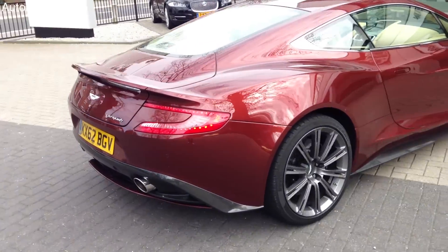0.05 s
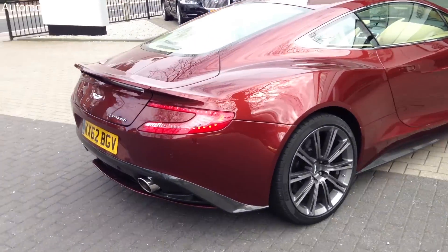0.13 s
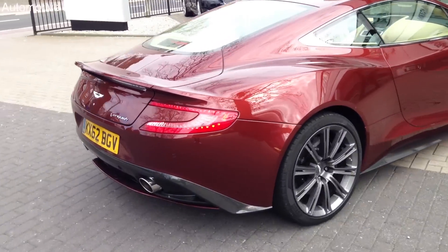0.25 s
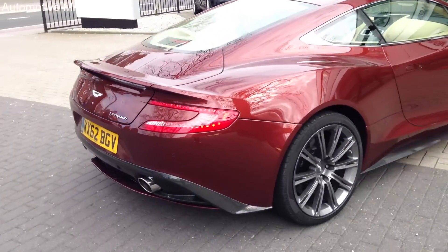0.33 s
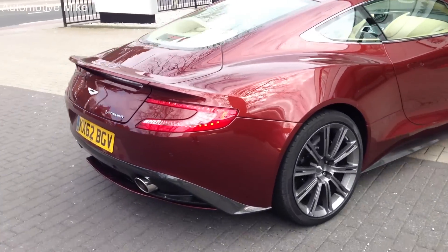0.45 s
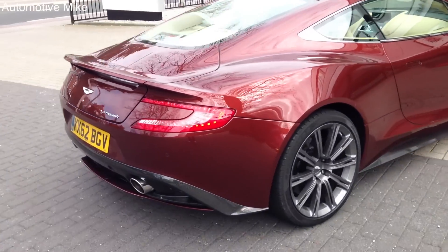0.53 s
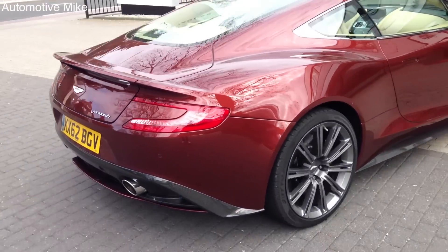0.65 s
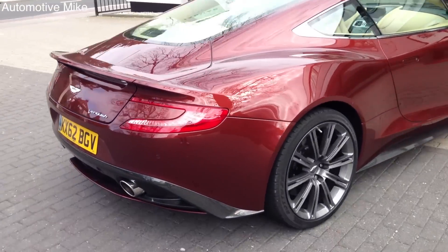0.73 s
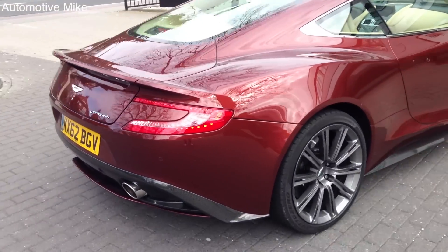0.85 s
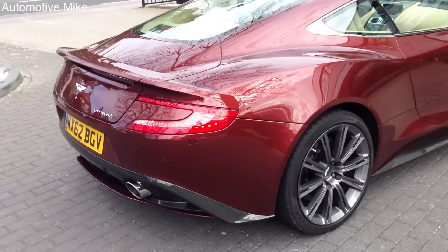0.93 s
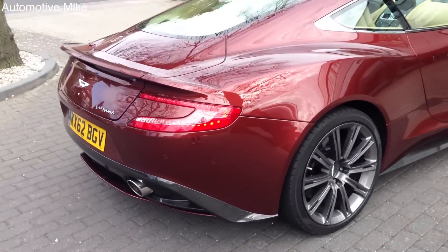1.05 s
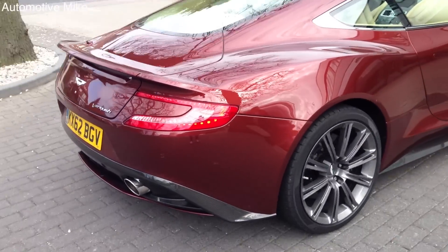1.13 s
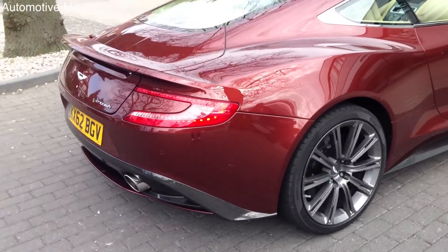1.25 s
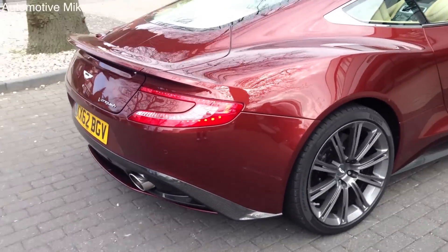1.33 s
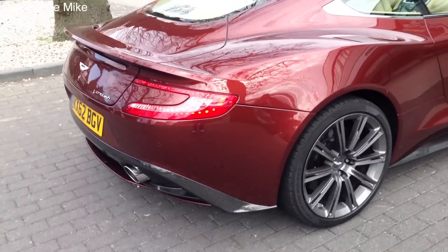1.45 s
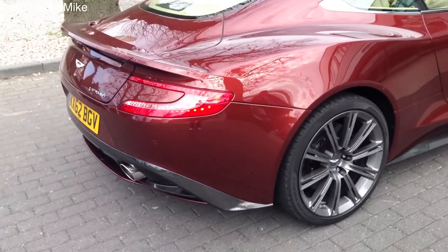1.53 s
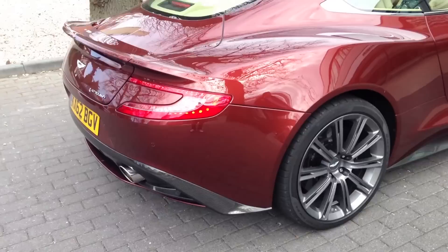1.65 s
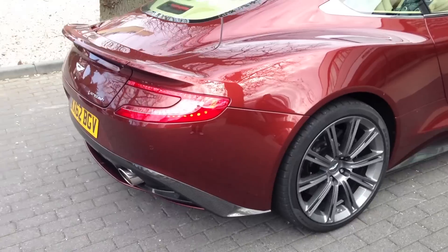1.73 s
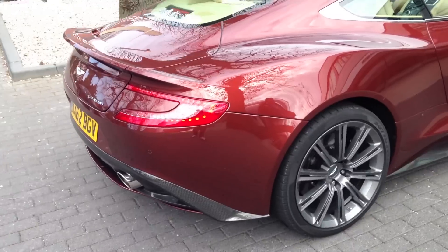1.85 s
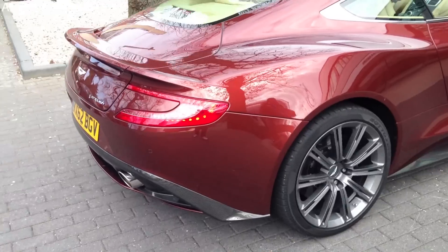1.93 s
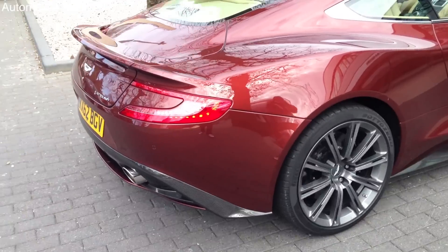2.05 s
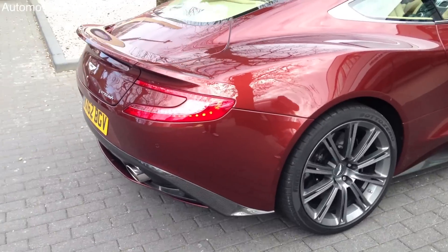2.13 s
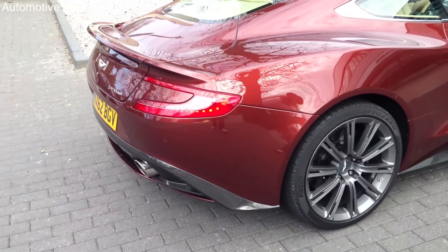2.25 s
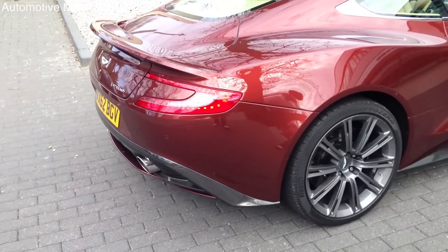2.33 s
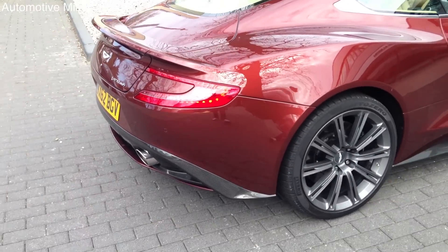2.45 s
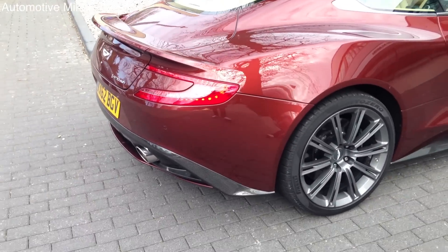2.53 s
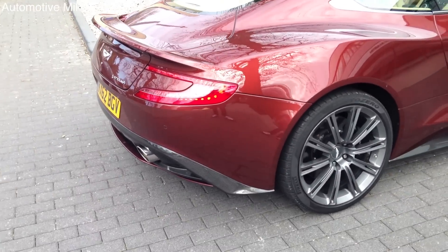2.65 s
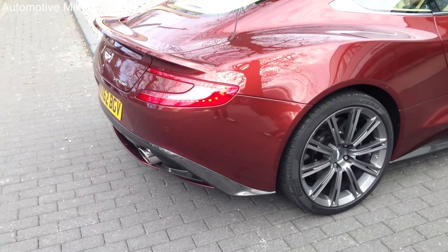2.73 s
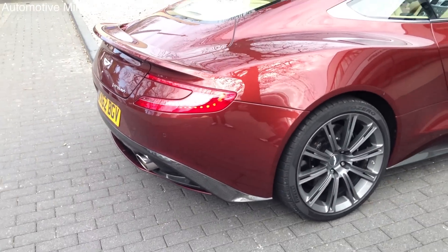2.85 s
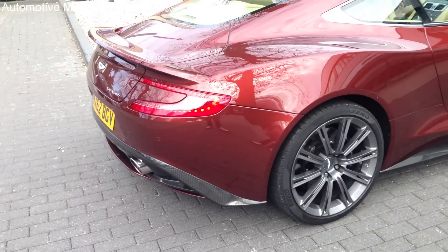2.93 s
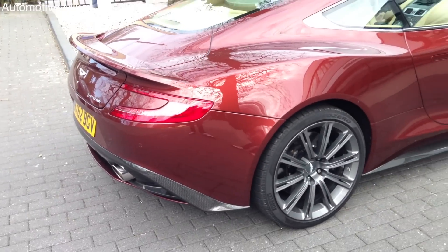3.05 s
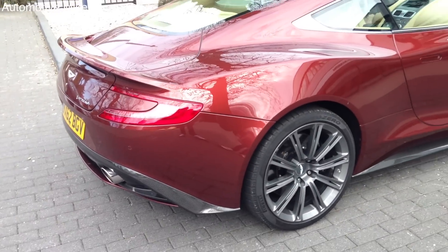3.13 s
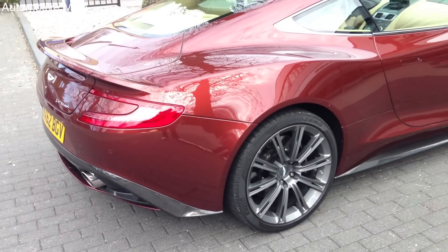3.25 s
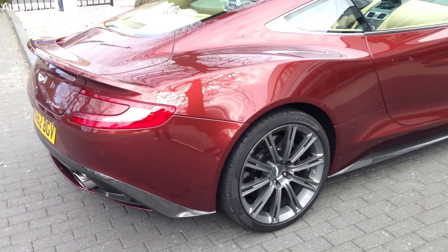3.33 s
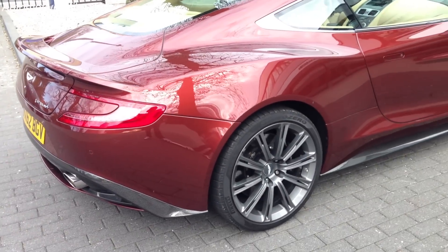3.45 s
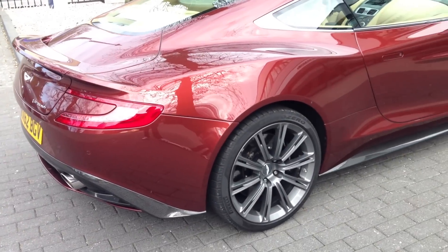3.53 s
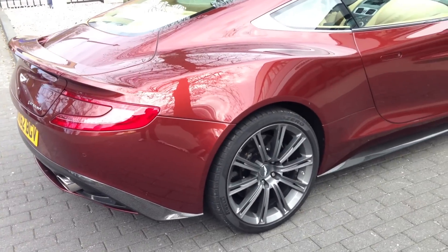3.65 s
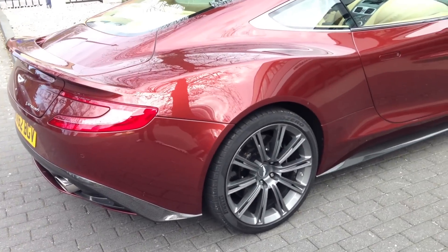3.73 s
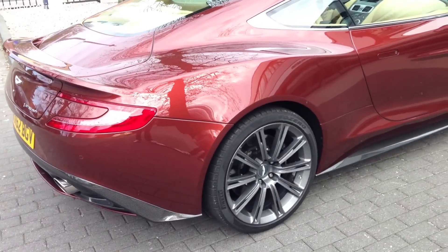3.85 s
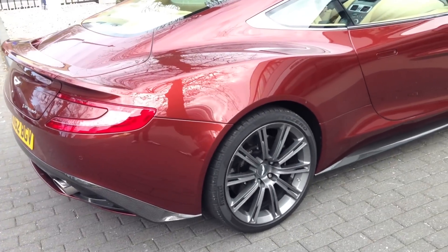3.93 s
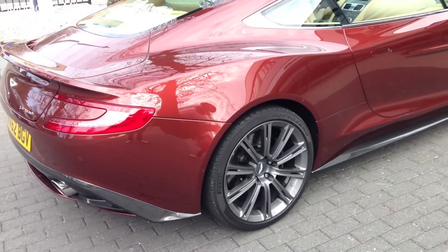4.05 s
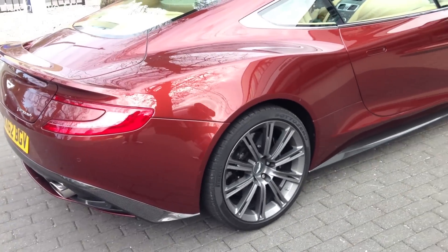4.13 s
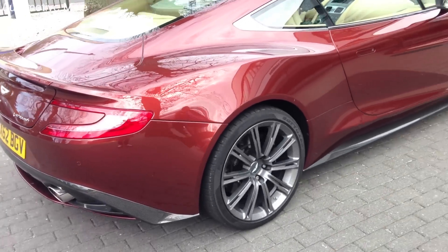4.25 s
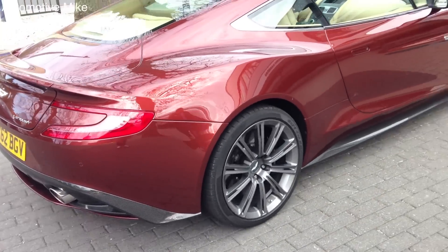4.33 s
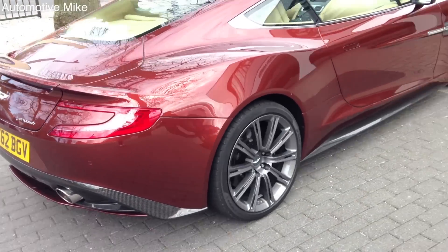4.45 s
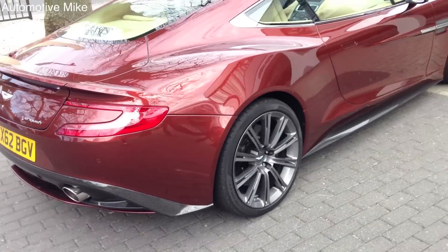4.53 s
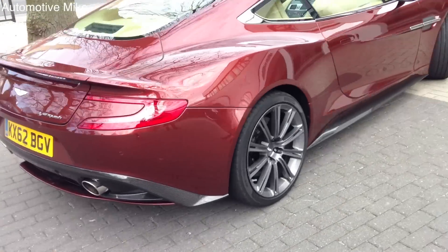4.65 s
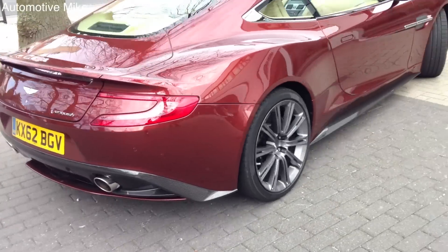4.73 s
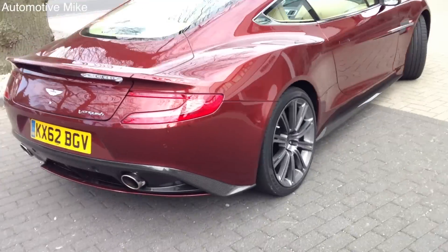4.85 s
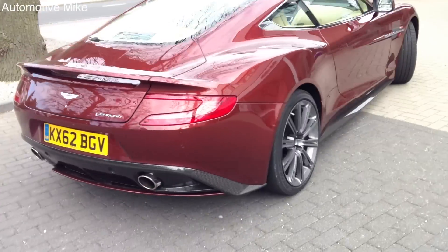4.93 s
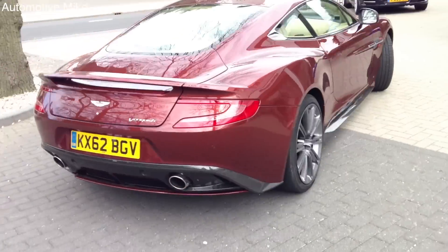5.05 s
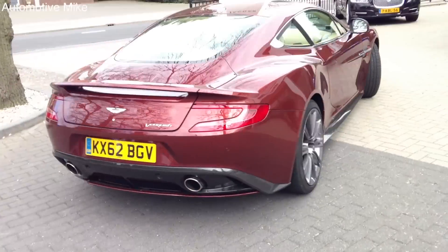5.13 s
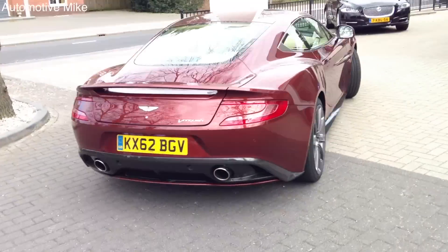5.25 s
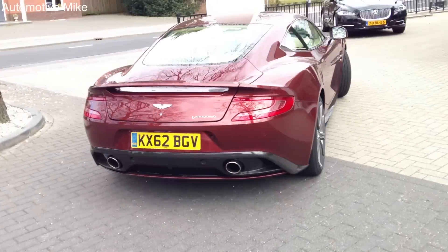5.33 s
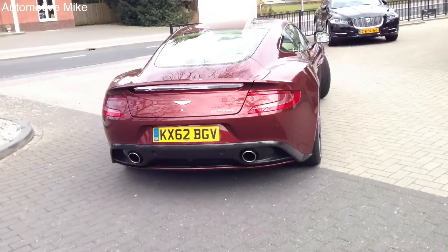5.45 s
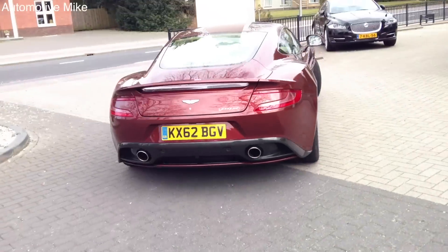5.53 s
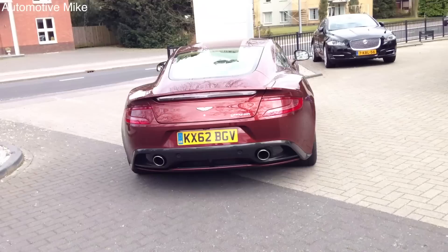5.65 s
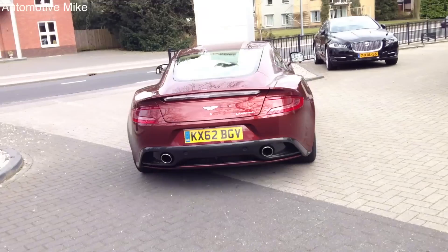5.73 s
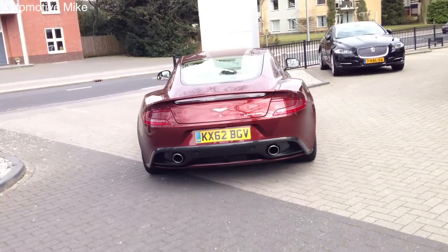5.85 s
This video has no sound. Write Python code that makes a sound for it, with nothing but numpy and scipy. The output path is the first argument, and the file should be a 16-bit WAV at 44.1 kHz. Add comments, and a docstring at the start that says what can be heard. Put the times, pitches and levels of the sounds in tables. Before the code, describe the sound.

Close single-channel pickup of a big car's tail pipes: a soft, lumpy burble with breathy gas hiss and faint distant-traffic air. After a brief rise in idle speed and a quiet dip, the engine climbs quickly into a loud, snarling, gritty pull-away, then falls to a smoother low drone as it recedes. Low thumps on the microphone and sharp stone clicks under the tyres are scattered throughout.

```python
"""Twelve-cylinder car pulling away

A twelve-cylinder car idles on a paved forecourt, creeps round, then pulls away with a short burst of throttle.
Uneven firings excite the exhaust resonances: tones at half multiples of crank speed give the boom, puffs and
dense high orders the rasp that opens under load, and filtered noise the hissing gas and the rush of air.
Around it: quiet street air as shaped noise, a faint high whine as narrow-band noise, dull bumps at the
hand-held microphone as damped swings, and grit ticking under the tyres as short noise cracks."""
import sys
import numpy as np
from scipy import signal
from scipy.fft import rfft, irfft, next_fast_len
from scipy.io import wavfile
from scipy.ndimage import uniform_filter1d

SR = 44100
rng = np.random.default_rng(int(sys.argv[2]) if len(sys.argv) > 2 else 0)


def master(y):
    """Save y as 16-bit WAV."""
    cut = np.clip(np.atleast_2d(y).T, -1, 1)
    pcm = np.round(cut * 32767)  # scale
    wavfile.write(sys.argv[1], SR, pcm.astype(np.int16))


def ratio(d):
    """dB to gain"""
    e = np.asarray(d, float) / 20
    return 10 ** e


N = 259308
TIME = np.arange(N) / SR

# Spectrum of the street air. Each row: frequency in Hz, relative gain in dB.
STREET_SPECTRUM = [(20, -32), (32, -17), (50, -10.5), (90, -8), (300, -6), (700, -16), (1500, -24),
                   (3000, -33.5), (5000, -37), (9500, -36.5), (15300, -40.5)]
# Dull bumps at the microphone. Each row: start in seconds, approximate peak in dB.
BUMPS = [(0.219, -29), (1.747, -35), (1.898, -42), (2.245, -30.5), (3.14, -35), (3.549, -40), (3.786, -34),
         (4.187, -46), (4.646, -38), (4.946, -19), (5.09, -26), (5.473, -38), (5.679, -40)]
# Grit under the tyres. Each row: start in seconds, peak in dB, centre in Hz, decay of the noise in seconds.
TICKS = [(0.5, -34, 1060, .009), (0.87, -50, 5500, 0.033), (0.92, -54, 4500, .03), (3.143, -50, 8000, .005),
         (3.445, -46.5, 5070, .005), (5.058, -36, 6000, 0.005), (5.347, -25.5, 2560, 0.0036)]
# Speed of the crankshaft. Each row: time in seconds, turns per second.
CRANK_SPEED = [(0.0, 11.21), (0.4, 11.29), (0.6, 11.12), (1.0, 11.44), (1.8, 10.98), (2.2, 11.53),
               (2.4, 12.26), (2.6, 13.2), (2.8, 13.55), (3.4, 13.24), (3.6, 12.76), (3.8, 11.86),
               (4.0, 11.81), (4.2, 12.69), (4.4, 14.64), (4.8, 20.71), (5.05, 23.65), (5.3, 25.42),
               (5.4, 25.36), (5.48, 24.7), (5.62, 23.0), (5.88, 22.1)]
# Crack of each cylinder in the pipe at idle, in firing order. Each entry: mean strength in dB.
CYLINDERS = [-6, -3, -8, 2, -5, 0, -6, -8, -6, 3, -4, 8]
# Load on the engine. Each row: time in seconds, gain in dB of the drone, of the rasp,
# and of the rush of air and tyres.
LOAD = [(0.0, -43, -52, -60), (0.6, -43.5, -52.5, -64.5), (1.0, -40, -50.5, -62), (1.8, -47, -53, -62.5),
        (2.2, -41.5, -50, -65.5), (2.7, -39, -45.5, -70), (3.6, -39, -48, -79), (4.0, -50, -56.5, -71),
        (4.25, -43, -55, -66), (4.4, -43.5, -42.5, -63.5), (4.7, -29, -30.5, -54), (4.9, -25.5, -28, -53),
        (5.1, -25.5, -23, -51), (5.33, -26, -27, -50.5), (5.5, -29.5, -35, -52.5),
        (5.65, -31.5, -39.5, -55), (5.88, -36, -48, -57.5)]
# Low exhaust resonances. Each row: centre in Hz, width in Hz, relative gain in dB.
BOOM = [(64, 42, -25), (104, 22, -13), (161, 26, -7), (187, 44, 0), (249, 70, -5)]
# Boom over its usual gain. Each row: time in seconds, gain in dB of the two lowest resonances, of the highest.
BOOM_LEVEL = [(0.0, 1.5, 2), (1.0, -2.5, 1), (1.8, 4.5, 4), (2.4, 0, 3.5), (3.2, -5, -0.5), (3.7, 1, 3.5),
              (4.0, 9.5, 7.5), (4.3, 2, 8.5), (4.7, -2, 3), (5.1, 2.5, -0.5), (5.4, 1.5, 1), (5.88, 4.5, 0)]
# Middle exhaust resonances. Each row: centre in Hz, width in Hz, relative gain in dB.
UPPER = [(343, 90, -17.5), (416.2, 40, -14), (476.4, 57, -15.5), (536.4, 21.6, -15)]
# Middle resonances in the drone. Each row: time in seconds, gain in dB of the lowest, of the others.
UPPER_LEVEL = [(0.0, 2, 8), (0.5, 2, 4), (1.0, -5, 0), (1.5, -25, -4), (2.4, -11, 8), (3.0, 2, 2.5),
               (3.7, 1.5, 10), (4.0, -9, 12), (4.4, -9, -23), (4.9, -2, 3), (5.2, 9.5, 3), (5.36, 8, 6.5),
               (5.6, 7.5, 5), (5.88, 3, 6)]
# High exhaust resonances. Each row: centre in Hz, width in Hz, relative gain in dB.
RASP = [(409, 125, -1.5), (506, 82, 0), (770, 67, -2.5), (861, 60, -0.5), (986, 72, -8), (1028, 51, -12.5),
        (1282, 88, -7.5), (1520, 130, -13.5)]
# Resonances that only the hard flow of revving excites. Each row: centre in Hz, width in Hz, gain in dB.
SNARL = [(540, 50, -6), (930, 200, -6), (1040, 60, -8), (1295, 60, -18)]
# Tones of the firing pattern, one row per half multiple of crank speed from FIRST_ORDER up.
# Each row: gain in dB at idle, at fast idle, pulling, off throttle at speed.
ORDER_TONES = [(3, -9, -4, -8), (-7, -7, 10, 0), (-5, -6, -8, -5), (-6, -5, -7, 3), (10, 7, 16, 12),
               (-2, -10, -14, -2), (-3, -9, -7, -15), (3, -4, -9, -12), (-7, -14, -9, -14),
               (-8, -8, -11, -21), (13, 10, 5, -4), (-14, -12, -11, -4), (-15, -6, 1, 11), (-5, -2, 1, -4),
               (-10, -1, 2, 2), (-6, -7, -4, 3), (12, 16, 1, 10), (-7, -11, -4, -1), (-9, -3, 4, 1),
               (-2, -1, -1, -3), (-3, 6, -2, -4), (-10, -4, -3, -9), (13, 8, 4, 0), (-5, 1, -5, 0),
               (6, 9, -10, 9), (-1, 4, -10, 2), (2, -8, -4, -2), (-7, -13, -5, -7), (3, -2, -4, -4),
               (-3, -9, 4, 6), (4, 7, -6, -4), (-1, 0, -9, -4), (-2, -5, -3, -7), (0, -2, 2, -8),
               (7, 1, -11, -13), (-4, -3, 1, -11), (5, -1, -3, -7), (-2, -5, -5, -4), (-8, -6, 7, -3),
               (-12, -12, 3, -9), (-4, -4, 3, -2), (-4, -6, 7, -2), (-12, -5, 11, 0), (4, -8, 6, -1),
               (0, 0, 3, -10), (-2, 0, 4, -3), (1, 0, 5, 0), (-5, 2, 5, -1), (1, -4, 5, -2),
               (-11, -3, 5, -6), (-7, -3, 5, -7), (-12, -11, 5, -8), (-4, 0, 5, -4), (-6, -7, 5, 1),
               (-4, -2, 5, 4), (-11, -14, 5, 2)]
FIRST_ORDER = 4
# Spectrum of the gas hiss. Each row: frequency in Hz, relative gain in dB.
GAS_SPECTRUM = [(900, -5.5), (1150, -4), (1400, 5), (1620, -0.5), (2000, -3.5), (2290, -4), (2600, -5),
                (2900, -4), (4000, -21), (6000, -33), (12000, -33)]
# Spectrum of the rush of air and tyres. Each row: frequency in Hz, relative gain in dB.
RUSH_SPECTRUM = [(1500, -5), (3500, -2.5), (7000, -5), (11000, -11), (15300, -23)]
# Hard firings as the throttle opens. Each row: start in seconds, peak in dB.
BARKS = [(4.538, -26.5), (4.586, -22)]
# Bands of grit in the exhaust jet. Each row: centre in Hz, width in Hz, gain in dB at top speed.
JET_GRIT = [(1960, 220, -3.5), (2218, 300, 6), (2740, 250, -3), (3290, 230, -4), (3870, 800, -7.5)]
# Grit in the exhaust jet under load. Each row: time in seconds, gain in dB.
JET_GRIT_LEVEL = [(4.4, -75), (4.65, -50.5), (4.9, -48), (5.1, -49.5), (5.3, -43.5), (5.42, -50.5),
                  (5.6, -67), (5.88, -61)]

EVEN_AT_SPEED = 0.6  # share of the cylinder pattern and of the turbulence lost when revving
SWELL_TURN = 0.25  # share of a turn at which roar and jet grit swell


def level(x, db):
    """Root mean square: scale a signal to a given rms level in dB."""
    return x * ratio(db) / np.sqrt(np.mean(x ** 2))


def colour(x, gain):
    """Minimum-phase filtering: the folded cepstrum of a gain over Hz gives a causal response."""
    size = next_fast_len(len(x) + SR // 2)
    hz = np.fft.rfftfreq(size, 1 / SR) + 1e-3
    cepstrum = irfft(np.log(gain(hz) + 1e-9), size)
    cepstrum[1:size // 2] *= 2
    cepstrum[size // 2 + 1:] = 0
    return irfft(rfft(x, size) * np.exp(rfft(cepstrum)), size)[:len(x)]


def resonances(modes):
    """Parallel resonance: the powers of steep modes add, leaving dark gaps in between."""
    def gain(hz):
        return np.sqrt(sum(ratio(2 * db) / (1 + ((hz - f * f / hz) / width) ** 2) ** 2 for f, width, db in modes))
    return gain


def slope(points):
    """Spectral envelope: gain in dB runs straight over log frequency between the points."""
    hz_at, db_at = np.transpose(points)
    return lambda hz: ratio(np.interp(np.log(hz), np.log(hz_at), db_at))


def columns_at(time, table):
    """Linear interpolation: every column of a table whose first column is time in seconds."""
    s, *columns = np.transpose(table)
    return [np.interp(time, s, column) for column in columns]


def walk(rate):
    """Random modulation: chance levels held 1 / rate seconds and smoothed twice."""
    hold = int(SR / rate)
    steps = np.repeat(rng.standard_normal(N // hold + 1), hold)
    return uniform_filter1d(uniform_filter1d(steps, hold), hold)[:N]


def slow(size, width):
    """Smoothed chance: noise averaged twice over width steps and brought to unit spread."""
    wander = uniform_filter1d(uniform_filter1d(rng.standard_normal(size), int(width)), int(width))
    return wander / wander.std()


def steady(x, window_s=0.45):
    """Power normalisation: even out the slow swell, so that a later gain sets it."""
    return x / np.sqrt(uniform_filter1d(x ** 2, int(window_s * SR)))


def revs(turns):
    """Speed scale: 0 up to 14 turns per second, 1 from 20."""
    return np.clip((turns - 14) / 6, 0, 1)


def street():
    """Broadband noise: distant traffic and air blend into one spectrum that swells gently."""
    air = level(colour(rng.standard_normal(N), slope(STREET_SPECTRUM)), -45.5)
    return air * ratio(0.7 * walk(2.5))


def bumps(hz=60, decay_s=0.0037):
    """Heavily damped oscillation: each bump is one low swing that dies almost at once."""
    out, t = np.zeros(N), np.arange(8000) / SR
    swing = t / decay_s * np.exp(1 - t / decay_s) * np.sin(2 * np.pi * hz * t)
    for s, db in BUMPS:
        out[int(s * SR):][:len(t)] += ratio(db) * swing
    return out


def ticks():
    """Impulsive excitation: grit gives short decaying noise through one wide resonance."""
    out, t = np.zeros(N), np.arange(4000) / SR
    for s, db, hz, decay_s in TICKS:
        noise = rng.standard_normal(len(t)) * np.exp(-t / decay_s)
        crack = colour(noise, resonances([(hz, 0.74 * hz, 0)]))
        out[int(s * SR):][:len(t)] += ratio(db) * crack / abs(crack).max()
    return out


def whine():
    """Narrow-band noise: a sharp resonance makes a faint, unsteady high tone while the car idles near."""
    tone = colour(rng.standard_normal(N), resonances([(6700, 130, 0)]))
    nearness = np.exp(-((TIME - 1.7) / 1.3) ** 2)  # strongest at 1.7 s
    return level(tone, -73) * ratio(2.5 * walk(14)) * nearness


def jet_grit(turns, spit_db=5, patchy_db=6):
    """Amplitude modulation: grit at the tail pipes is bands of hiss, each flaring alone, all pulsing per turn."""
    angle = 2 * np.pi * (np.cumsum(turns) / SR - SWELL_TURN)
    opening_db = 0.5  # per octave above the lowest band and turn per second
    bands = 0
    for mode in JET_GRIT:
        octaves = np.log2(mode[0] / JET_GRIT[0][0])
        band = colour(rng.standard_normal(N), resonances([mode]))
        bands = bands + band * ratio(patchy_db * walk(12) + opening_db * octaves * (turns - turns.max()))
    gate = ratio(spit_db * (np.cos(angle) + walk(60)))
    gain_db, = columns_at(TIME, JET_GRIT_LEVEL)
    return level(bands * gate, 0) * ratio(gain_db)


def barks(rise_s=0.0037, decay_s=0.024):
    """Transient resonance: each hard firing drives a short burst of gas through the upper pipe."""
    out, t = np.zeros(N), np.arange(4000) / SR
    pipe = resonances([(520, 150, -3), (830, 220, 0), (1270, 180, -2), (1600, 160, -7)])
    for s, db in BARKS:
        gas = rng.standard_normal(len(t)) * (1 - np.exp(-t / rise_s)) * np.exp(-t / decay_s)
        burst = colour(gas, pipe)
        out[int(s * SR):][:len(t)] += ratio(db) * burst / abs(burst).max()
    return out


def firings(turns, scatter_db):
    """Periodic excitation: twelve pulses in two turns even out with speed, and every burn differs."""
    count = 6 * np.cumsum(turns) / SR
    k = np.arange(int(count[-1]))
    jitter_s = 0.0004 * rng.standard_normal(len(k))  # burns come a little early or late
    at_s = np.clip(np.interp(k, count, TIME) + jitter_s, 0, TIME[-1])
    at = (at_s * SR).astype(int)
    uneven = 1 - EVEN_AT_SPEED * revs(turns[at])
    strength_db = uneven * np.take(CYLINDERS, k % len(CYLINDERS)) + scatter_db * rng.standard_normal(len(k))
    return np.bincount(at, ratio(strength_db), N)


def roar(turns, step=128):
    """Harmonic excitation: dense wavering high orders sing through the rasp resonances only when revving."""
    on = np.argmax(revs(turns) > 0)
    time, angle, out = TIME[on:], 2 * np.pi * np.cumsum(turns)[on:] / SR, 0
    coarse_time, coarse_turns = time[::step], turns[on::step]
    # this resonance climbs 28 Hz per turn per second as the gas speeds up
    whistle = (1580 + 28 * (coarse_turns - 20), 130, -12)
    pipe = resonances(RASP[2:-2] + SNARL + [whistle])
    for order in np.arange(23, 100, 0.5):
        hz = order * coarse_turns
        gain = pipe(hz) * ratio(4 * slow(len(hz), 30))
        phase = 2 * np.pi * rng.random() + 0.4 * slow(len(hz), 45)
        tone = np.cos(order * angle + np.interp(time, coarse_time, phase))
        out = out + np.interp(time, coarse_time, gain) * tone
    swell = np.cos(angle - 2 * np.pi * SWELL_TURN) + 0.5 * walk(30)[on:]  # once a turn
    out = out * ratio(3.6 * swell)
    return np.r_[np.zeros(on), steady(out) * ratio(-2) * revs(turns[on:])]


def order_phase(order):
    """Phase alignment: low whole orders form a throb, the next an afterbeat, the highest stay scattered."""
    chance = rng.standard_normal()
    if order < 18 and not order % 1:
        return 0.5 * chance
    if order < 25:
        return 1.15 * chance - 2 * np.pi * order * 0.43  # lined up 0.43 turn later, every second turn
    return np.pi * chance


def drone(turns, load_db, step=128):
    """Fourier synthesis: one tone per order takes the gain of the pipe, and uneven burns make it waver."""
    angle = 2 * np.pi * (np.cumsum(turns) / SR - 0.46)  # the throb lines up at 0.46 of a turn
    coarse, speed = TIME[::step], turns[::step]
    revving = revs(speed)
    fast = np.clip((speed - 11.7) / 1.4, 0, 1)  # 0 at idle, 1 at fast idle
    lifted = np.clip((-load_db[::step] - 3) / 5, 0, 1)  # off throttle the rasp sinks under the drone
    low_boom, top_boom = map(ratio, columns_at(coarse, BOOM_LEVEL))
    lowest, others = map(ratio, columns_at(coarse, UPPER_LEVEL))
    out = 0
    for k, (idle_db, fast_db, pull_db, lift_db) in enumerate(ORDER_TONES):
        order = FIRST_ORDER + k / 2
        hz = order * speed
        boom_edges = np.hypot(low_boom * resonances(BOOM[:2])(hz), top_boom * resonances(BOOM[-1:])(hz))
        boom = np.hypot(resonances(BOOM[2:-1])(hz), boom_edges)
        upper = np.hypot(lowest * resonances(UPPER[:1])(hz), others * resonances(UPPER[1:])(hz))
        pipe = np.hypot(boom, upper)
        idling_db = idle_db + fast * (fast_db - idle_db)
        driving_db = pull_db + lifted * (lift_db - pull_db)
        tone_db = (1 - revving) * idling_db + revving * driving_db
        unrest = order / 15  # higher orders feel burn-to-burn scatter more
        waver_db = ((1.3 + 1.2 * revving) * unrest + 1.2 * revving) * slow(len(hz), 25)
        gain = pipe * ratio(tone_db + waver_db)
        phase = order_phase(order) + (0.25 + 0.15 * revving) * unrest * slow(len(hz), 40)
        tone = np.cos(order * angle + np.interp(TIME, coarse, phase))
        out = out + np.sqrt(2) * np.interp(TIME, coarse, gain) * tone
    return out


def engine():
    """Source and resonator: firings and turbulent flow drive the pipe as drone, rasp, hiss and rush."""
    turns, = columns_at(TIME, CRANK_SPEED)
    drone_db, rasp_db, rush_db = columns_at(TIME, LOAD)
    # the gas hiss follows both the rasp and the rush, in dB per dB
    gas_db = -61.5 + 0.56 * (rasp_db - rasp_db[0]) + 0.46 * (rush_db - rush_db[0])
    pulses = firings(turns, scatter_db=2.5)
    t = np.arange(2000) / SR
    puff = np.convolve(pulses, t * np.exp(-t / 0.0021))[:N]  # flow swells and fades after each valve opening
    swirl = level(puff * rng.standard_normal(N), 0)
    rumble = level(colour(swirl, resonances(BOOM)), -17)  # turbulence fills in between the tones
    snap = level(uniform_filter1d(pulses, 24), 0)
    crack = colour(snap + 1.8 * swirl, resonances(RASP[2:-2]))
    breath = colour(1.5 * swirl + 2.2 * rng.standard_normal(N), resonances(RASP[:2] + RASP[-2:]))
    rasp = steady(crack + breath) * (1 - EVEN_AT_SPEED * revs(turns)) + roar(turns)
    hiss = colour(0.7 * swirl + rng.standard_normal(N), slope(GAS_SPECTRUM))
    gas = steady(hiss) * ratio(2 * walk(8) + 2 * walk(25))
    rush = level(colour(rng.standard_normal(N), slope(RUSH_SPECTRUM)), 0) * ratio(1.1 * walk(10))
    boom = drone(turns, rasp_db - drone_db) + rumble
    tail_pipes = ratio(drone_db) * boom + ratio(rasp_db) * rasp + ratio(gas_db) * gas
    return tail_pipes + ratio(rush_db) * rush + barks() + jet_grit(turns)


def scene():
    """Superposition: the pressures of all sources add at one microphone, with a soft start and end."""
    fade = np.clip(np.minimum(TIME, TIME[-1] - TIME) / 0.008, 0, 1)
    mix = street() + bumps() + ticks() + whine() + engine()
    return (fade * mix)[None]


def low_pass(x):
    """Removes everything above the highest recorded frequency."""
    return signal.sosfilt(signal.butter(12, 15610, fs=SR, output="sos"), x)


def record(dry):
    """Single-channel pickup: the finished mix is taken down as one channel."""
    return low_pass(dry)


dry = scene()
out = record(dry)
master(out)
```